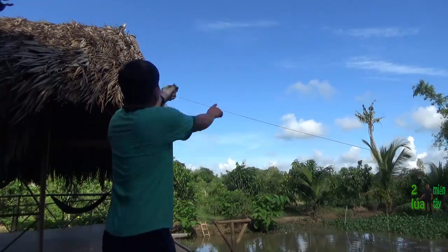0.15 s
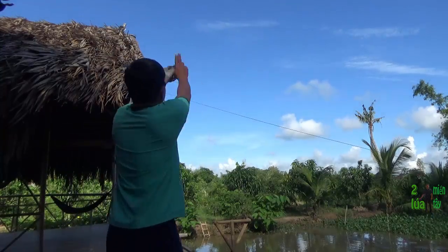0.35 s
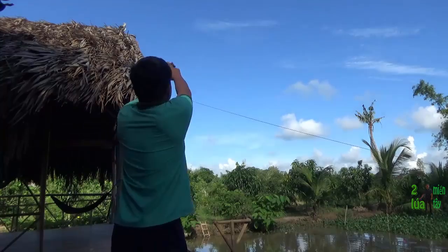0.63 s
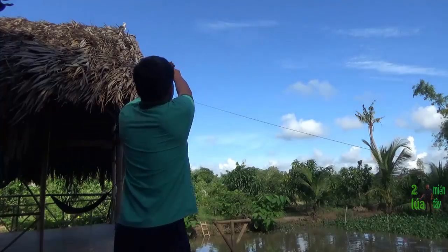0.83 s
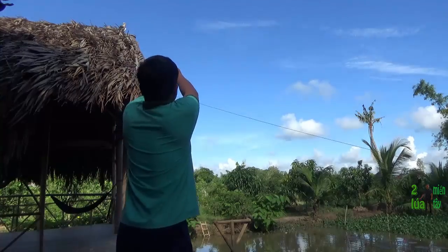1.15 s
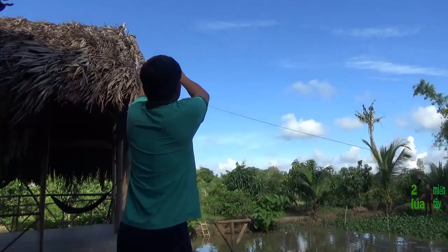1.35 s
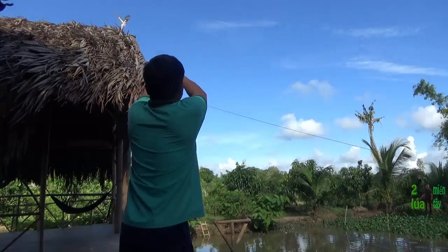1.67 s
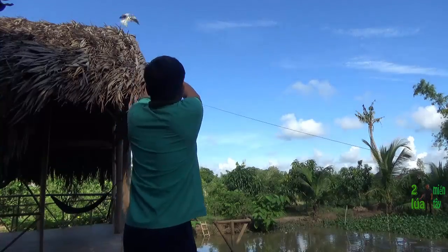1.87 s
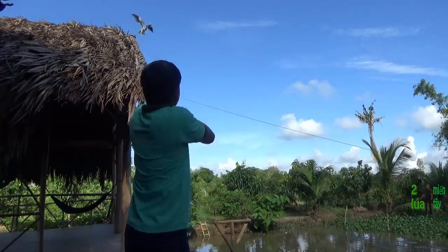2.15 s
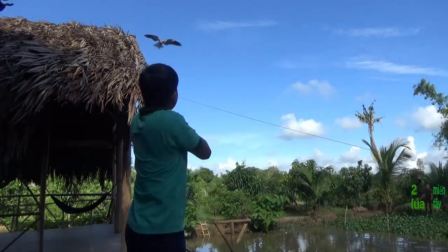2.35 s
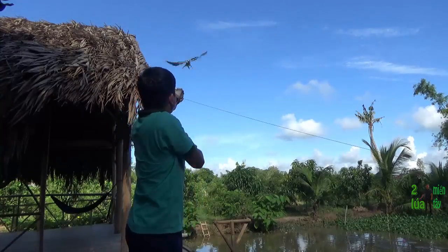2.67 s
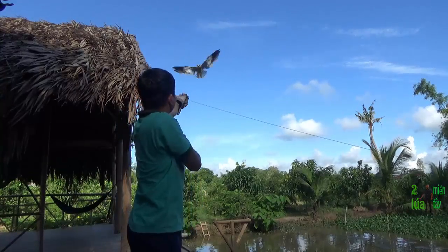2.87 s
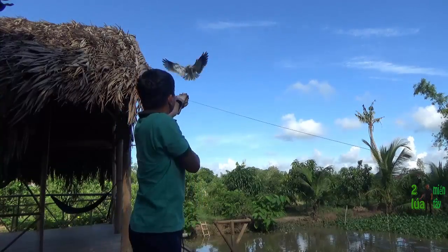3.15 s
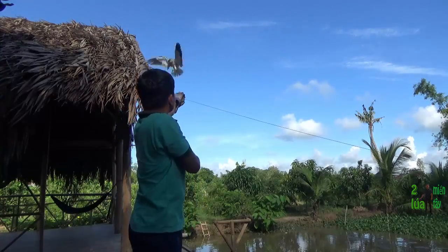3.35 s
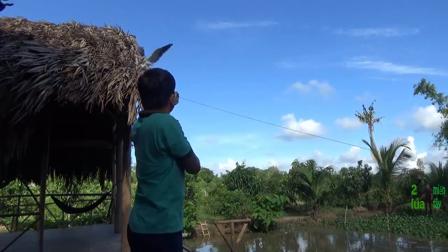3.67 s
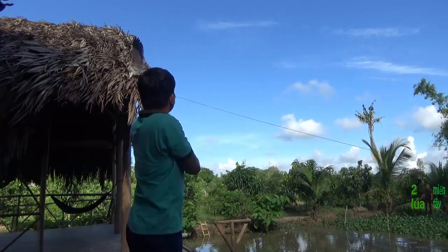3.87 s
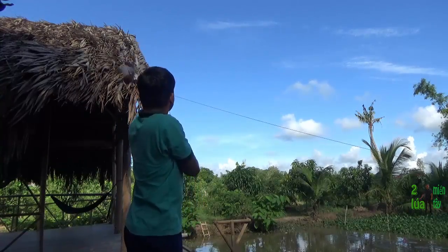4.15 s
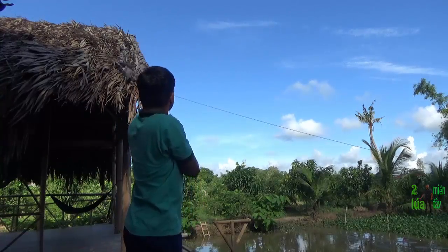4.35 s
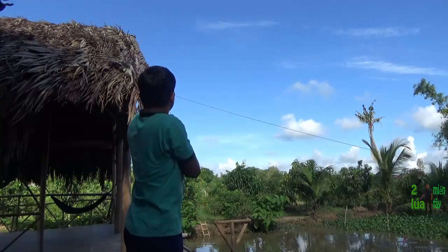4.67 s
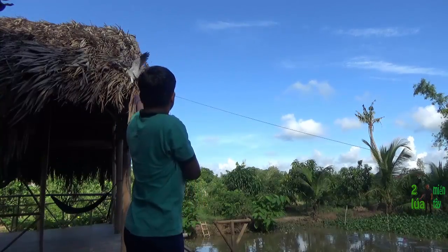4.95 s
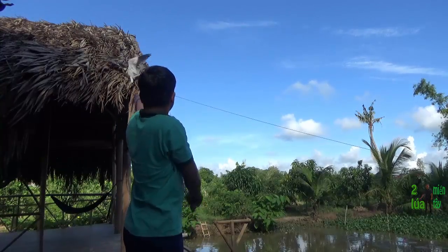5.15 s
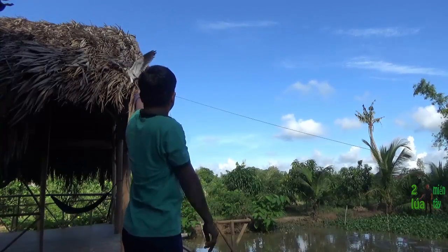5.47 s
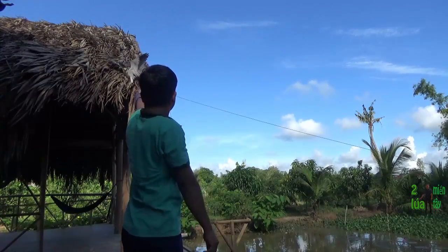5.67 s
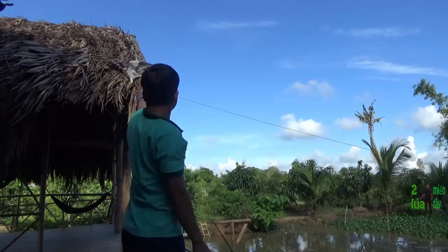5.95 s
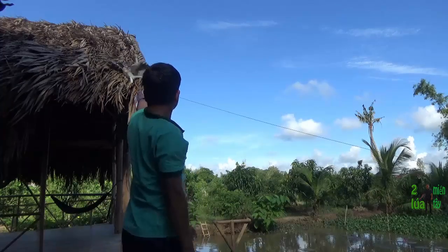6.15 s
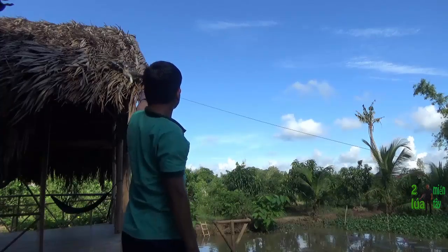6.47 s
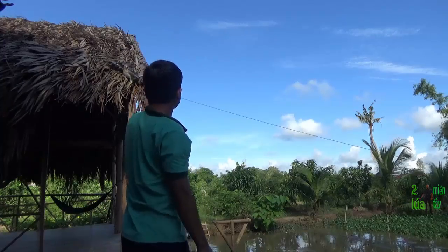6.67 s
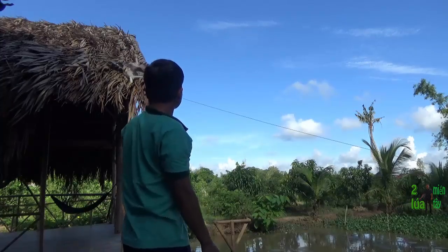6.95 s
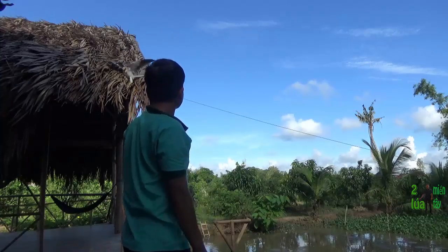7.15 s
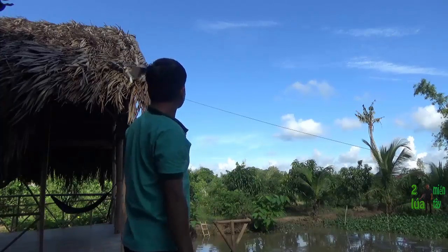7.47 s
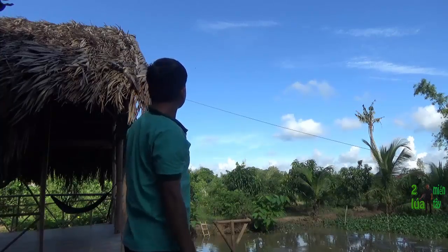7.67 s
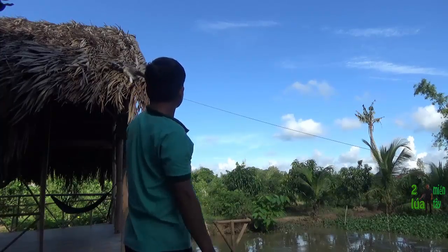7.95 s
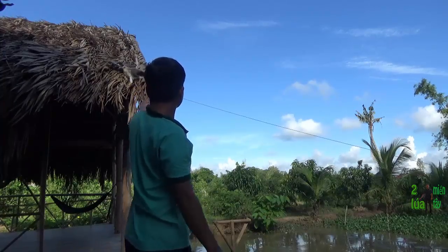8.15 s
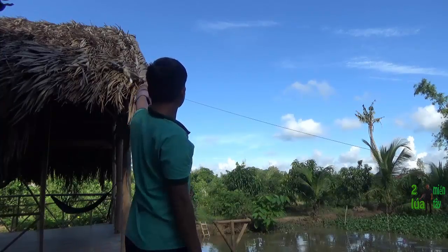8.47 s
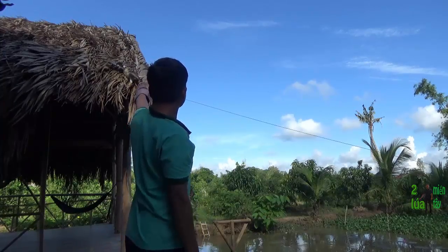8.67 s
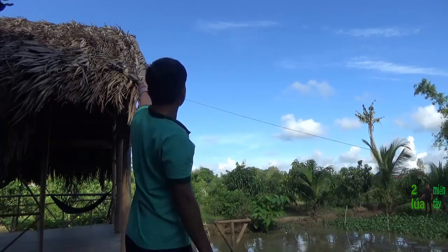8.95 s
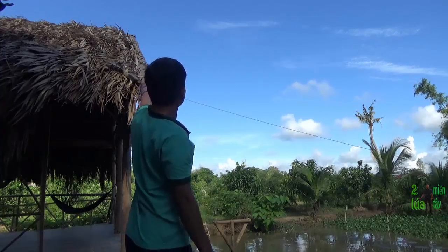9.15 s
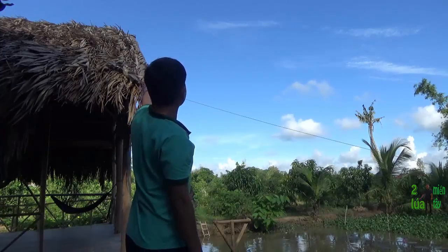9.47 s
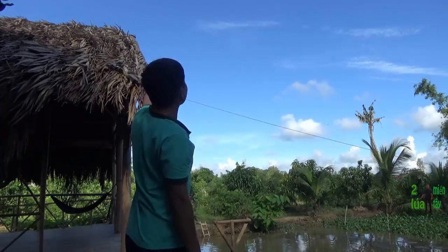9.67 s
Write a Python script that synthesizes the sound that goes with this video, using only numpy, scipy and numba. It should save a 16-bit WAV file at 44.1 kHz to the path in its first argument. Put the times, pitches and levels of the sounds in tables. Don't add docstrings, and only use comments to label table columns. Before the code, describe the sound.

A near young bird of prey gives harsh, breathy screeches, mostly long and steady, while a thinner, higher one answers and glides up behind it. Short rising whistles fill the gaps, in clusters at the start, middle and end. Small twig ticks, soft pond plops and faint distant twitters sit over a low breeze and hum. Open yard by a hut, short reflections, small stereo microphone slightly overloading on the loudest cries.

```python
import sys
import numpy as np
from scipy import signal
from scipy.io import wavfile
from scipy.ndimage import uniform_filter1d, map_coordinates
from numba import njit

SR = 44100
rng = np.random.default_rng(int(sys.argv[2]) if len(sys.argv) > 2 else 0)


def to_wav(sig):
    pcm = np.clip(np.atleast_2d(sig), -1, 1) * 32767
    pcm = np.round(pcm).astype(np.int16)
    wavfile.write(sys.argv[1], SR, pcm.T)


def boost(x):
    u = np.asarray(x, float) / 20
    return 10 ** u


N = 433062


def noise():
    return rng.standard_normal(N)


def unit(x):
    return x / np.sqrt(np.mean(x ** 2))


@njit
def moving_bandpass(x, g, k):
    y, band, low = np.empty(len(x)), 0., 0.
    for i in range(len(x)):
        v = (band + g[i] * (x[i] - low)) / (1 + g[i] * (g[i] + k[i]))
        band = 2 * v - band
        low += 2 * g[i] * v
        y[i] = k[i] * v
    return y


def ring(x, hz, width_hz):
    hz = np.clip(hz, 20, .45 * SR)
    g = np.tan(np.pi * hz / SR) + np.zeros(N)
    k = width_hz / hz + np.zeros(N)
    backward = moving_bandpass(x, g, k)[::-1].copy()
    return unit(moving_bandpass(backward, g[::-1].copy(), k[::-1].copy())[::-1])


def walk(rate_hz):
    hold = int(SR / rate_hz)
    steps = np.repeat(rng.standard_normal(N // hold + 1), hold)
    return 1.6 * uniform_filter1d(uniform_filter1d(steps, hold), hold)[:N]


def play(calls, edge_s, voices=None):
    t = np.arange(N) / SR
    rows = []
    for call, voice in zip(calls, voices or [()] * len(calls)):
        start_s, end_s = call[0][0], call[-1][0]
        for row in call:
            age_s = row[0] - start_s
            rows.append((*row, *voice, age_s, age_s / (end_s - start_s)))
    s, *columns = np.array(sorted(rows)).T
    gate = sum(np.clip(np.minimum(t - c[0][0], c[-1][0] - t) / edge_s + 1, 0, 1) for c in calls)
    return np.minimum(gate, 1), [np.interp(t, s, c) for c in columns]


# frequency in Hz, density in dB per Hz.
FIELD_SPECTRUM = [(15, -51), (25, 1), (76, 6.5), (255, 1.5), (324, -3.5), (1120, -8.5), (1510, -10),
                  (2030, -6), (2810, -6), (5370, -17), (6140, -19), (9460, -15), (15800, -49)]
# time in seconds, level in dB.
BREEZE_LEVEL = [(0.0, -36), (0.24, -53.5), (1.04, -52), (1.2, -39.5), (2.87, -51.5), (3.44, -41),
                (6.26, -53.5), (6.37, -42), (7.0, -49), (7.9, -43), (8.42, -61.5), (9.05, -40), (9.38, -59),
                (9.82, -47.5)]


def field():
    field_db, side_gain = -47, .2
    hum_hz, hum_db, throb_hz = 111.5, -56.5, 21.1
    t = np.arange(N) / SR
    at_hz, at_db = np.transpose(FIELD_SPECTRUM)
    breeze_db = np.interp(t, *np.transpose(BREEZE_LEVEL)) + 50
    out = 0
    for hz in 25 * 2 ** np.arange(0, 9.4, .5):
        mid, side = ring(noise(), hz, hz / 2), ring(noise(), hz, hz / 2)
        db = np.interp(np.log(hz), np.log(at_hz), at_db) + 10 * np.log10(hz) + 1.5 * walk(4.9)
        stereo = mid + side_gain * side * np.array([[1], [-1]])
        out = out + boost(db + breeze_db / (1 + (hz / 300) ** 2)) * stereo
    throb = 1 + 0.99 * np.sin(2 * np.pi * throb_hz * t)
    return boost(field_db) * unit(out) + boost(hum_db) * throb * ring(noise(), hum_hz, 23)


# start in seconds, length in seconds, pitch in Hz, loudest
# level in dB.
FAR_CALLS = [
    (0.358, 0.08, 5900, -56),
    (.64, .18, 1700, -61),
    (5.778, 0.14, 6040, -58.5),
    (8.309, 0.16, 5250, -54),
]


def far_birds():
    swell_db = -10
    calls = [[(s, hz, db + swell_db), (s + length / 3, hz, db), (s + length, hz, db + swell_db)]
             for s, length, hz, db in FAR_CALLS]
    gate, (hz, db, *_) = play(calls, .015)
    return gate * boost(db + 2 + 5 * walk(27)) * ring(noise(), hz, 560)


# time in seconds, peak level in dB, centre in Hz, decay in seconds.
KNOCKS = [
    (.384, -20.5, 2280, 0.00062),
    (.471, -27.5, 3450, 0.00042),
    (0.827, -27, 2240, 0.0046),
    (2.775, -39, 520, 0.0075),
    (2.82, -46, 767, 0.018),
    (2.898, -35, 790, 0.009),
    (3.028, -36.5, 461.4, 0.014),
    (5.775, -41, 7000, .002),
    (5.984, -42, 2392, 0.0032),
    (8.456, -36.5, 1960, 0.0036),
]


def ticks():
    out, t = np.zeros(N), np.arange(2000) / SR
    for s, db, hz, decay_s in KNOCKS:
        rough = 1 + uniform_filter1d(rng.standard_normal(2000), size=8)
        start = int(s * SR)
        out[start:start + 2000] += boost(db) * rough * np.exp(-t / decay_s) * np.sin(2 * np.pi * hz * t)
    return out


# start in seconds, length in seconds, first and last pitch in Hz, level in dB.
WHISTLES = [(0.223, 0.088, 1910, 2115, -20), (0.481, 0.0586, 1944, 2130, -28),
            (0.618, 0.097, 2063, 2150, -21.5), (0.832, .085, 1990, 2180, -21),
            (1.815, 0.049, 1840, 2027, -15.5), (4.48, .065, 1600, 2060, -33.5),
            (5.085, 0.093, 1630, 1932, -24), (5.246, .032, 1362, 1369, -31),
            (5.322, 0.072, 1653, 1920, -21.5), (5.476, 0.097, 1525, 1940, -25.5),
            (5.656, 0.061, 1710, 1922, -24.5), (5.819, .034, 1885, 1960, -30.5),
            (5.911, 0.025, 2210, 2263, -33), (5.945, 0.028, 1720, 1674, -33),
            (9.326, 0.051, 1775, 1962, -19.5), (9.47, 0.051, 1715, 1955, -19.5)]
# multiple of the pitch, level in dB.
WHISTLE_OVERTONES = [(2, -37), (3, -40)]
# resonance in Hz, width in Hz, level in dB.
LOOSE_PARTS = [(5900, 330, -30), (9680, 400, -34), (13700, 400, -38)]


def chirps():
    attack_s, release_s, start_db, end_db, swell_db = 0.012, .015, -32, -33, 2
    wall_s, wall_gain = .017, .72
    calls = []
    for s, length, first_hz, last_hz, db in WHISTLES:
        calls.append([(s, first_hz, db + start_db),
                      (s + attack_s, first_hz, db - swell_db),
                      (s + length - release_s, last_hz, db),
                      (s + length, last_hz, db + end_db)])
    gate, (hz, db, *_) = play(calls, 0.0026)
    phase = 2 * np.pi * np.cumsum(hz * (1 + 0.00314 * walk(60))) / SR
    tone = np.sin(phase) + sum(boost(d) * np.sin(k * phase) for k, d in WHISTLE_OVERTONES)
    tone += sum(boost(d) * ring(noise(), f, width_hz) for f, width_hz, d in LOOSE_PARTS)
    tone *= gate * boost(db)
    return tone + wall_gain * np.roll(tone, int(wall_s * SR))


@njit
def pulse_train(hz, stretch, size):
    out, phase, k = np.zeros(len(hz) + 1), 0., 0
    for i in range(len(hz)):
        step = hz[i] * stretch[k] / SR
        phase += step
        if phase >= 1:
            phase, k = phase - 1, k + 1
            late = min(phase / step, 1.)
            out[i] -= size[k] * late
            out[i + 1] -= size[k] * (1 - late)
    return out[:-1]


def syrinx(hz, jitter, scatter_db):
    periods = np.exp(jitter * rng.standard_normal(N // 4))
    hardness = np.minimum(rng.exponential(size=N // 4), 3)
    return unit(pulse_train(hz, periods, boost(scatter_db * hardness)))


# time in seconds, low resonance in Hz, pulse rate in Hz, effort in dB.
THIN_CUT_INS = [
    [(1.87, 1980, 3597, -27.5), (2.03, 2210, 4088, -26), (2.13, 2040, 3879, -29), (2.17, 2550, 3845, -30),
     (2.29, 2570, 3760, -27.5), (2.41, 2060, 3990, -30), (2.5, 2716, 3932, -29), (2.6, 2240, 3846, -29)],
    [(4.25, 2360, 3720, -26), (4.3, 2450, 3665, -22), (4.45, 2750, 3610, -23.5), (4.54, 2490, 3596, -19.5)],
    [(5.28, 2399, 3790, -33), (5.36, 2346, 3600, -21), (5.53, 2350, 3710, -22.5), (5.64, 2352, 3712, -24.5)],
]
# time in seconds, low resonance in Hz, pulse rate in Hz, effort in dB.
THIN_RISES = [
    [(2.95, 1650, 2992, -38), (2.985, 1880, 3162, -32.5), (3.035, 2030, 3431, -28.5),
     (3.05, 2050, 3546, -26), (3.11, 1940, 3600, -30), (3.17, 2630, 3560, -25.5), (3.23, 2320, 3577, -23.5)],
    [(6.025, 1600, 2860, -42), (6.2, 2274, 3487, -31), (6.43, 2350, 3800, -23.5), (6.5, 2744, 4022, -26.5),
     (6.56, 2460, 3897, -26), (6.79, 2500, 3778, -23.5), (6.822, 2280, 3750, -19.5)],
    [(8.49, 1530, 3103, -63), (8.6, 2086, 3420, -47), (8.62, 2306, 3558, -34.5), (8.76, 2253, 3730, -33),
     (8.86, 2470, 3610, -27), (9.0, 2163, 3960, -24.5), (9.175, 2080, 3972, -22.5), (9.2, 1463, 3478, -23)],
    [(9.51, 2316, 2460, -37), (9.62, 2360, 3345, -31.5), (9.72, 2350, 3740, -28), (9.82, 2353, 3834, -26.5)],
]
# low strand in dB, extra at the start in dB, rasp in dB, clear tone in dB.
THIN_VOICING = [(-1.5, -6, 0, -9), (-9.5, 0, -7, -1.5), (-8.5, -3, -15, -2.5), (-0.5, -14.5, 1, -1.5),
                (-5, 4, -13.5, -2.5), (-4, 20, -5, -4.5), (-8.5, 5, -14.5, -4)]


def thin_bird():
    settle_s = 0.14
    clear_per_effort, rasp_per_effort = -.35, .1
    upper_hz, upper_follow = 3940, 0.87
    gate, columns = play(THIN_CUT_INS + THIN_RISES, 0.0041, THIN_VOICING)
    low_hz, hz, db, low_db, start_db, rasp_db, clear_db, age_s, _ = columns
    main_db = -low_db - start_db * np.exp(-age_s / settle_s)
    rasp_db = main_db + rasp_db + rasp_per_effort * (db + 27)
    clear_db = np.minimum(clear_db + clear_per_effort * (db + 27), 6)
    db = db - main_db
    low_hz = low_hz * (1 + .006 * walk(30))
    hz = hz * (1 + .004 * walk(30))
    breath = syrinx(hz, jitter=.12, scatter_db=8.0) + 1.2 * noise()

    low_clear_db = clear_db + np.clip(-.7 * main_db + 4, 0, 9)
    voice = ring(breath, low_hz, 700) + boost(low_clear_db) * ring(breath, low_hz, 90)
    voice += boost(-8) * ring(breath, 2 * low_hz, 300)
    voice += boost(main_db) * (ring(breath, hz, 620) + boost(clear_db + 2) * ring(breath, hz, 110))
    rasp = ring(breath, 1.23 * hz, 1980) + boost(-6) * ring(breath, 1.124 * hz, 230)
    voice += boost(rasp_db) * rasp
    voice += boost(-11.5) * ring(breath, 370, 1340)
    voice += boost(rasp_db - 8) * ring(breath, 8300, 6100)
    voice += boost(main_db - 27.5) * ring(breath, 14500, 6000)
    for k, share_db in ((2, -24), (3, -26), (4, -30)):
        strand_hz = k * upper_hz * (hz / upper_hz) ** (upper_follow / k)
        voice += boost(main_db + share_db) * ring(breath, strand_hz, 510)
    effort_db = 1.5 * walk(45)
    return gate * boost(db - 10.0 + effort_db) * voice


# time in seconds, gape resonance in Hz, effort in dB, strain in dB.
NEAR_SCREECHES = [
    [(0.0, 4150, -27, 1.5), (0.11, 3820, -29.5, 2), (0.15, 3570, -42, -3)],
    [(0.826, 2900, -57, -32), (0.862, 2735, -39, -2), (0.95, 3260, -35.5, -4), (1.2, 3990, -30, 0),
     (1.82, 3800, -29.5, 0), (1.87, 3700, -38.5, -6)],
    [(2.58, 4196, -36, -2), (2.626, 4250, -30, 0), (2.715, 4200, -35, -2), (2.735, 3700, -24, 4.5),
     (2.75, 3700, -39, -2)],
    [(3.23, 3200, -35, -2), (3.27, 3190, -27.5, -3.5), (3.46, 4110, -26.5, -3.5), (4.0, 4270, -28, -2.5),
     (4.06, 3970, -29, 7), (4.25, 3800, -29, 0)],
    [(4.53, 3900, -37, -3.5), (4.63, 4130, -30.5, 0), (5.17, 4200, -29, 5)],
    [(5.18, 4000, -30, 8.5), (5.28, 4000, -29, 0)],
    [(6.835, 3406, -34.5, -12.5), (7.3, 3600, -30, 1), (7.96, 3710, -27.5, 0), (8.03, 4400, -29, -11.5),
     (8.2, 4100, -30, -14)],
]
# first and last pulse rate in Hz, clear tone in dB.
NEAR_VOICING = [(2102, 2100, 1), (2050, 2050, -2), (2240.5, 2230, -7), (2130, 2170, -12.5), (2157, 2140, 5),
                (1913, 1925, -23), (1810, 2070, -16)]


def near_bird():
    gate, columns = play(NEAR_SCREECHES, 0.0086, NEAR_VOICING)
    gape_hz, db, strain_db, first_hz, last_hz, clear_db, _, done = columns
    hz = first_hz + (last_hz - first_hz) * done
    shut = np.clip((3600 - gape_hz) / 650, 0, 1)
    gape_db = 8 - 0.5 * shut
    throat_db = -15.5 + 29 * shut
    third_db = 4 + 0.71 * strain_db
    clear_db = clear_db - 1.4 * strain_db - 21 * shut
    source = syrinx(hz, jitter=.2, scatter_db=5.0) + 1.07 * noise()

    voice = ring(source, hz, 1850) + boost(clear_db) * ring(source, hz, 87)
    voice += boost(throat_db) * ring(source, 1760, 165)
    voice += boost(gape_db) * (ring(source, gape_hz, 1450) + boost(-7.5) * ring(source, gape_hz, 260))
    voice += boost(third_db) * ring(source, 5990, 1520)
    voice += boost(strain_db) * ring(ring(source, 9480, 3900), 9680, 4400)
    voice = signal.sosfiltfilt(signal.butter(8, 11000, fs=SR, output="sos"), voice)
    voice += boost(-10) * ring(source, 304, 630)
    voice += boost(0.64 * strain_db - 7.5) * ring(source, 13100, 12000)
    effort_db = .6 * walk(25)
    return gate * boost(db - 6.0 + effort_db) * voice


def bounce(x, perch):
    s, *paths = np.transpose(perch)
    i = np.arange(N)
    here = np.searchsorted(s * SR, i, side="right") - 1
    ms, gain, other_ms, other_gain = (column[here] for column in paths)
    treble = signal.sosfilt(signal.butter(1, 500, "high", fs=SR, output="sos"), x)
    late, other = (map_coordinates(treble, [i - d * SR / 1000], order=3) for d in (ms, other_ms))
    return x + gain * late + other_gain * other


# delay in seconds, left level in dB, right level in dB.
EARLY_ECHOES = [(.0121, -10, -30), (.0187, -28, -10), (.031, -34, -24.5)]


def yard(x, wet_db, t60_s):
    t = np.arange(SR // 2) / SR
    shared = rng.standard_normal(len(t))
    tail = shared + 1.13 * uniform_filter1d(rng.standard_normal((2, len(t))), size=3)
    tail *= np.exp(-np.log(1000) * t / t60_s) * (t > .008)
    response = boost(-14 + wet_db) * tail / np.sqrt(np.sum(tail[0] ** 2))
    response[:, 0] = 1
    for s, left_db, right_db in EARLY_ECHOES:
        response[:, int(s * SR)] += boost(np.array([left_db, right_db]) + wet_db)
    return signal.fftconvolve(x[None], response, axes=1)[:, :N]


# from time in seconds, first delay in ms, its gain, second delay in ms, its gain.
NEAR_PERCH = [(0, 3.2, .3, 2.1, 0), (.5, 5.19, .4, 2.11, -.3), (2.3, 3.24, .25, 3.08, -.2),
              (4.4, 3.12, .4, 2.32, .22), (6, 3.13, .45, 3.38, -.2)]
# from time in seconds, first delay in ms, its gain, second delay in ms, its gain.
THIN_PERCH = [(0, 3.3, .2, 1.69, -.15), (5.8, 5.16, .35, 1.55, .2), (8.3, 5.12, .35, 2.03, .2)]


def scene():
    left = boost(np.array([[.6], [-.6]]))
    near = left * yard(bounce(near_bird(), NEAR_PERCH) + ticks(), wet_db=0, t60_s=0.33)
    thin = yard(bounce(thin_bird(), THIN_PERCH) + far_birds(), wet_db=0.5, t60_s=0.29)
    return field() + yard(chirps(), wet_db=2.5, t60_s=0.43) + thin + near


def top_cut(x):
    return signal.sosfilt(signal.butter(12, 16730, fs=SR, output="sos"), x)


def record(dry):
    saturated = np.tanh(1.91 * dry) / 1.562
    low_pass = signal.ellip(8, .2, 70, 15850, fs=SR, output="sos")
    return top_cut(signal.sosfilt(low_pass, saturated))


dry = scene()
out = record(dry)
to_wav(out)
```